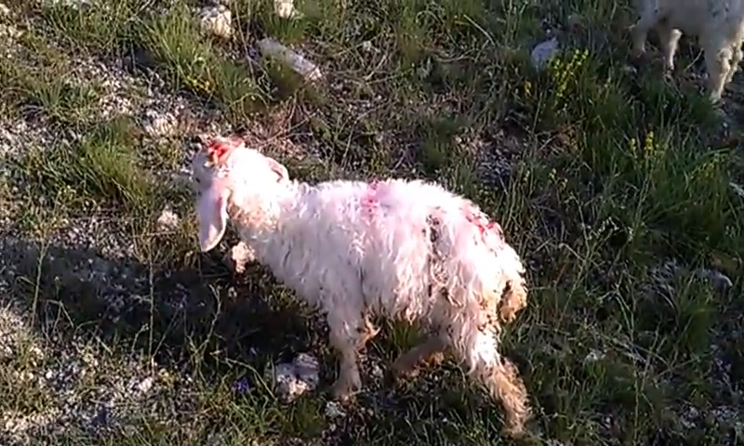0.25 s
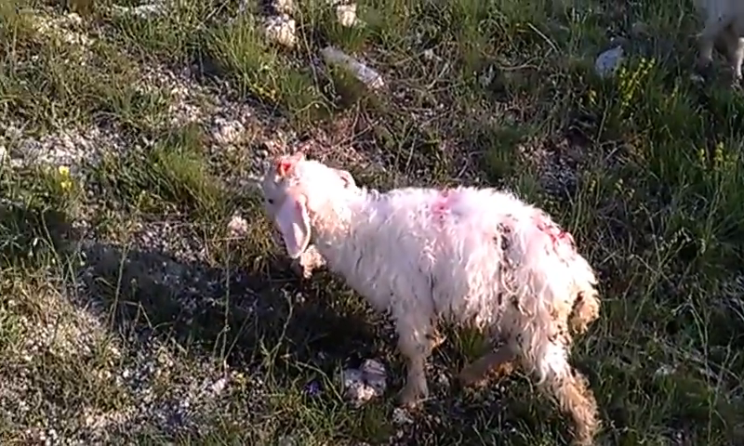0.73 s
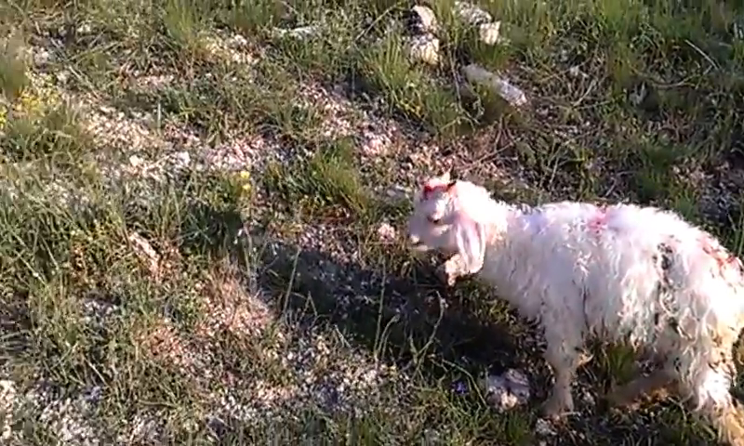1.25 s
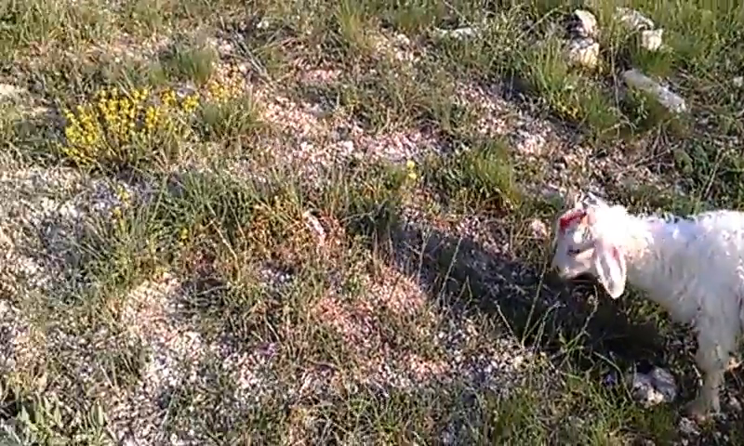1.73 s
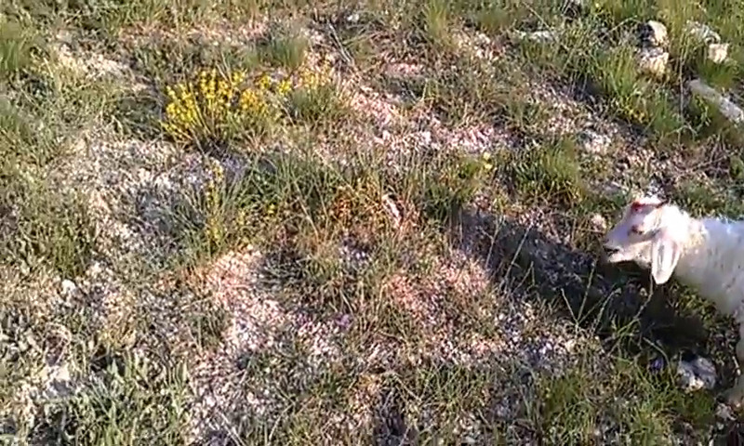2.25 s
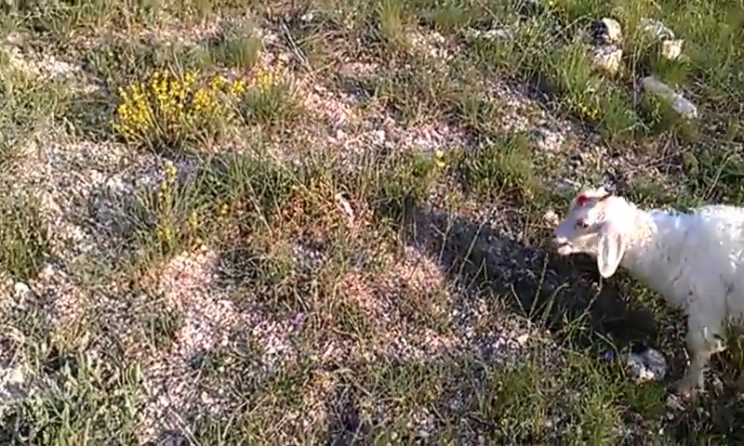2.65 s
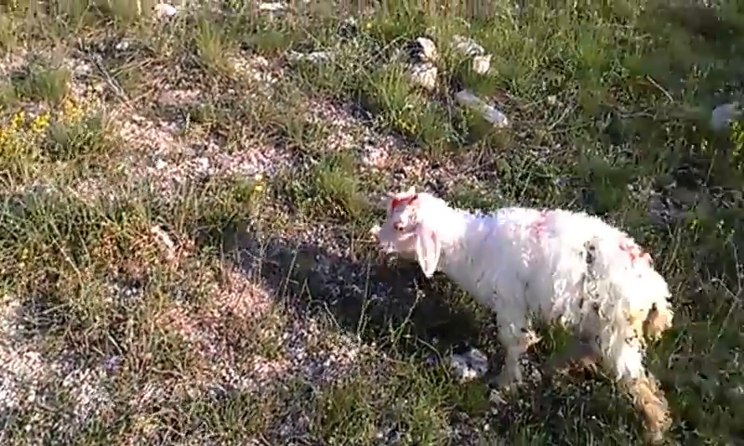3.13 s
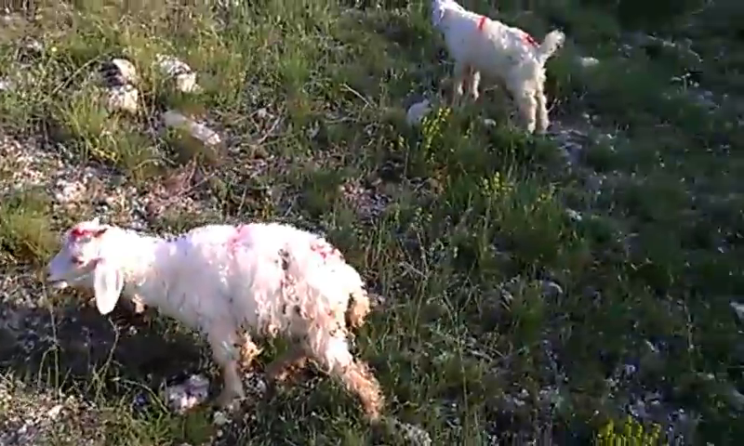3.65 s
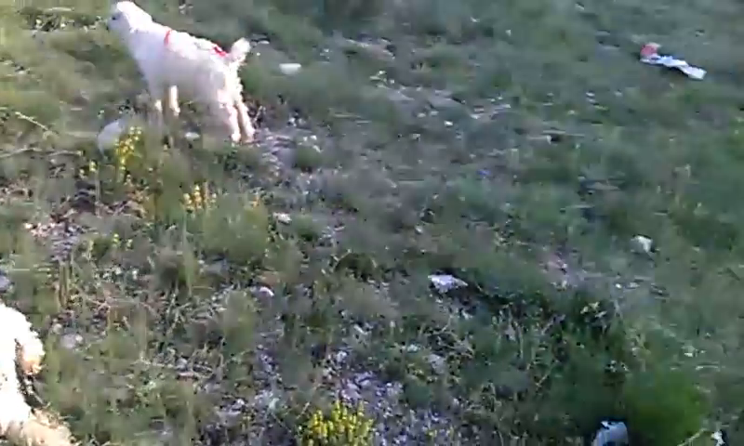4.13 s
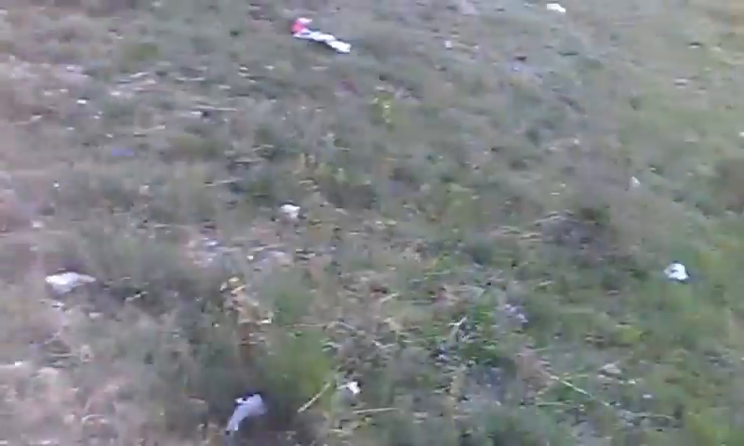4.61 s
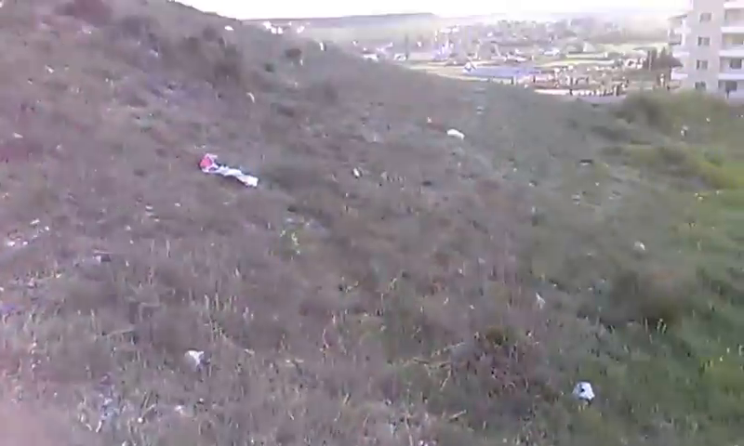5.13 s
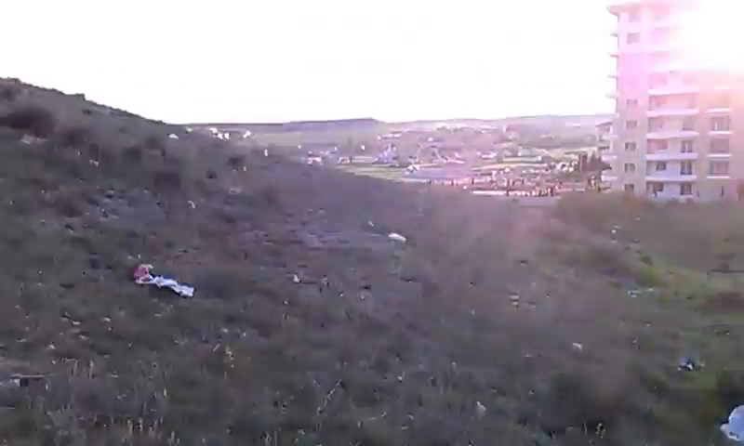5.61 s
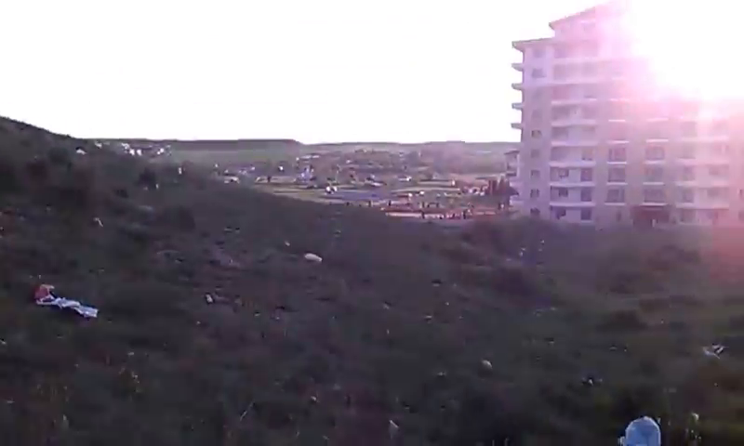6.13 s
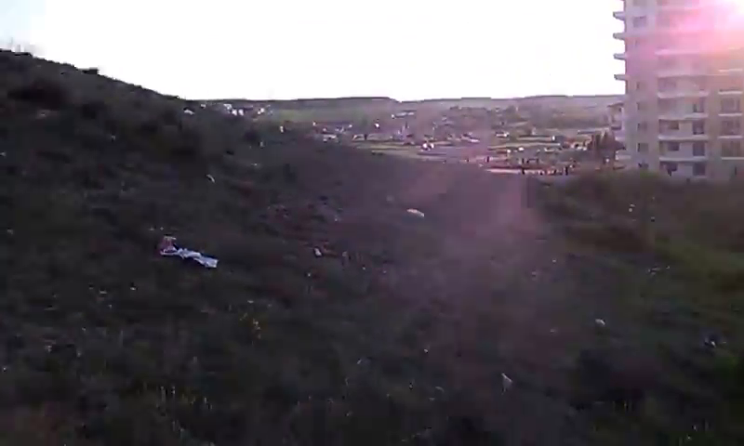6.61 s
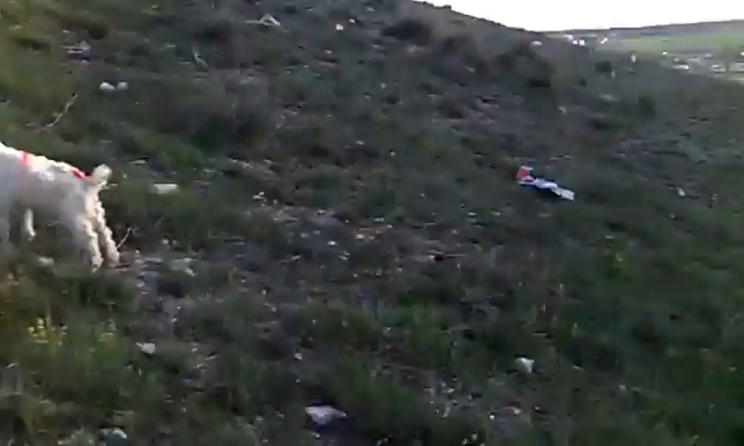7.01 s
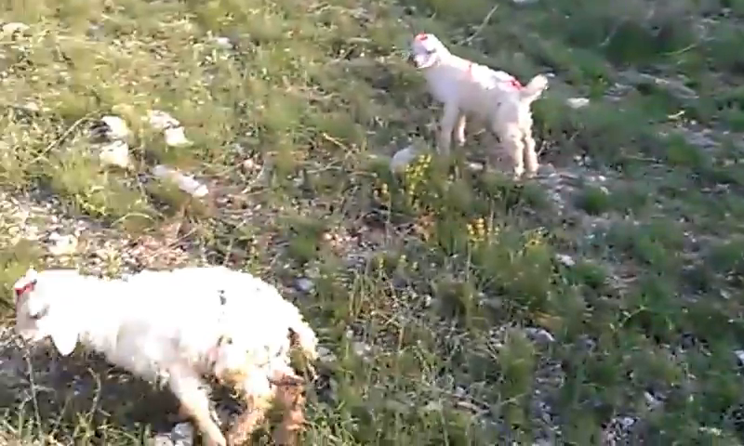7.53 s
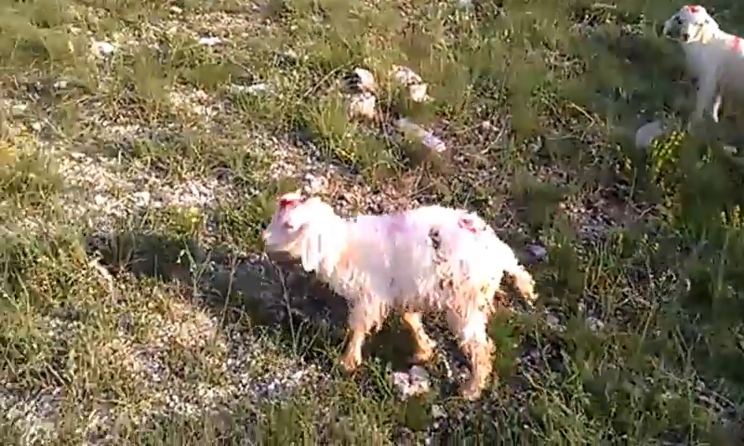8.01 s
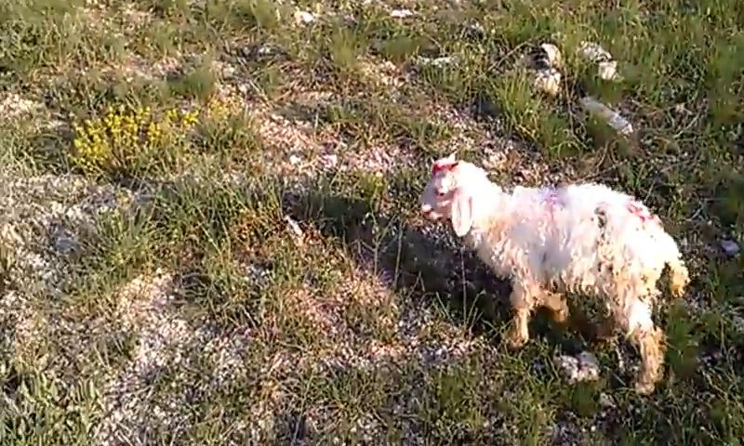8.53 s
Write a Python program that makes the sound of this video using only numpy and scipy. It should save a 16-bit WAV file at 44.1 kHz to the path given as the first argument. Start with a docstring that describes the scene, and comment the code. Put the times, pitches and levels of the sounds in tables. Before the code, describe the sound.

On a grassy hillside, a quavering kid's bleat overlaps another, followed by sparse fainter bleats, repeated falling bird chirps, cloth rustle and light wind.

```python
"""Two goat kids bleat on an open grassy slope, at first over each other, then in single shorter calls.
A small bird repeats phrases of four falling chirps; a sleeve swishes, dry grass ticks and wind puffs.
The bleats are harmonics shaped by a throat, the chirps and the far herd are sliding tones, and cloth, grass,
wind and background are mostly coloured noise. Two microphone ports hear it all, and a noise suppressor
in the camera turns quiet moments down."""
import sys
import numpy as np
from scipy import signal
from scipy.fft import rfft, irfft, next_fast_len
from scipy.io import wavfile
from scipy.ndimage import uniform_filter1d, map_coordinates

SR = 44100
rng = np.random.default_rng(int(sys.argv[2]) if len(sys.argv) > 2 else 0)


def bounce(signal):
    """Save signal as a 16-bit WAV file at the path given by the first command-line argument."""
    frames = np.transpose(np.atleast_2d(signal))
    limited = np.clip(frames, -1, 1)
    pcm = np.round(limited * 32767).astype(np.int16)
    wavfile.write(sys.argv[1], SR, pcm)


N = 386316  # length of the scene in samples

# Throat and mouth of each bleat. Each row: frequency in Hz, strength of a harmonic there in dB.
LONG_THROAT = [(480, -39), (1000, -23), (1480, -0.5), (1950, -21.5), (2500, -15), (3000, -13), (3500, -7.5),
               (4000, -8), (4500, -10.5), (5000, 0), (5450, -8), (5950, -39), (6600, -60), (9000, -95)]
SECOND_THROAT = [(480, -27.5), (950, -16.5), (1480, -9), (1900, -9.5), (2400, -2.5), (2850, -8), (3300, -6),
                 (3800, -4.5), (4700, -6), (6000, -74), (8000, -85.5)]
SHORT_THROAT = [(480, -32), (950, -20.5), (1420, -5), (1900, -7.5), (2400, -9), (2850, -4), (3300, 0.5),
                (3800, -8), (4250, -2), (4750, 3), (5200, -7.5), (5800, -36.5), (8000, -64)]
SIDE_THROAT = [(500, -38.5), (1000, -49.5), (1520, 1.5), (2000, -16.5), (2500, -18), (3050, -4),
               (3500, -11.5), (4500, -1.5), (5050, -11.5), (5700, -50.5), (8000, -66)]
LAST_THROAT = [(480, -44.5), (950, -27.5), (1450, -3), (1900, -13.5), (2400, -15), (2880, -7.5),
               (3350, -1.5), (3850, -7), (4350, -0.5), (4820, -2), (5300, -9.5), (5800, -14.5),
               (8000, -59.5)]
# How the kids' voices differ between the ports. Each row: frequency in Hz, left minus right in dB.
PORT_DIFFERENCE = [(1500, 1), (2600, -2), (3400, -0.5), (4400, -12.5), (5200, -14.5), (6500, 18.5)]
# Colour of the rasp in the long bleat. Each row: frequency in Hz, relative strength in dB.
RASP_COLOUR = [(1800, -18.5), (2300, -19), (2800, -9), (3300, -3), (3800, -13.5), (4300, -27.5),
               (5500, -42.5), (7000, -45.5)]
# The bleats, each an arch of pitch. Each row: start, crest and end in seconds, first, top and last pitch in Hz,
# flatness of the arch (a power), level in dB, attack and release in seconds.
BLEATS = [(.955, 1.27, 1.655, 446, 505, 436, 3.5, -30, 0.327, 0.1267),
          (.945, 1.47, 1.923, 437, 514, 424, 1.35, -36, 0.143, 0.892),
          (2.405, 2.63, 2.803, 423, 481, 421, 1.8, -44.5, 0.1298, 0.234),
          (6.52, 6.8, 7.14, 444, 507, 460, 1.6, -48, 0.198, 0.64),
          (7.81, 8.0, 8.16, 330, 483, 420, 4, -44.5, 0.136, 0.0498)]
# The quaver of each bleat. Each row: reference time of a crest in seconds, crests per second at that time,
# speed-up in crests per second each second, first and last depth in Hz (before the release shrinks it).
QUAVERS = [(1.472, 13.8, 18.5, 1.57, 14.53), (1.42, 4.555, 1, 1.6, 1.13), (2.565, 13.4, -7.5, 12.06, 1.43),
           (6.82, 6.8, 1, 2.24, 1.7), (12, 9.59, 2.5, 3.28, 1.52)]
EDGE_DB, EDGE_BEND = 22, 2.626  # a bleat starts and ends this far below its level; bend of attack and release
QUAVER_DB_PER_HZ = 0.1082  # the voice gets louder as the quaver lifts it
SLACK = 0.2  # dB that the top harmonics lose for each dB of weaker voice
# Even throbs of rasp: middle of the first, spacing and half-width in seconds, then strength
THROB_S, THROB_GAP_S, THROB_WIDTH_S, THROB_ROUGH = 1.094, 0.08837, 0.0176, 0.682

# Bird phrases. Each row: start of the last chirp in seconds, its level in dB,
# rise in dB that sets how the level climbs from chirp to chirp (below zero it sinks).
PHRASES = [(0.021, -39.5, -2), (0.582, -40.5, 2.5), (1.157, -36.5, 0.5), (1.895, -42.5, 2), (2.798, -57, 1),
           (3.305, -51.5, 1.5), (3.832, -40.5, 2), (4.312, -42, 1.5), (4.822, -40, 1.52), (5.316, -37, 0.5),
           (5.758, -34, 2.19), (6.275, -34.5, 2.48), (6.709, -35.5, 2.5), (7.271, -40, 2), (8.07, -38, 1.5),
           (8.586, -57.5, 0)]
# Single slurred whistles. Each row: start and length in seconds, first and last pitch in Hz, level in dB.
WHISTLES = [(.115, 0.049, 4046, 3420, -54.5), (.162, 0.04, 2753, 3052, -59.5),
            (3.17, 0.0835, 3880, 2947, -53.5), (3.312, 0.0733, 4870, 4022, -45),
            (3.755, 0.0287, 4040, 3425, -54.5), (3.775, 0.018, 3400, 4010, -52),
            (6.645, 0.024, 3970, 3213, -56.5), (7.67, 0.046, 3114, 3310, -59)]
# Length in seconds, first pitch and fall in Hz of the last chirp, before small random changes; bend of the fall
CHIRP_S, CHIRP_HZ, CHIRP_FALL_HZ, CHIRP_BEND = 0.03504, 4445.3, 574, 1.53
CHIRP_GAP_S, CHIRP_STEP = 0.0432, 0.007  # spacing in a phrase; share by which each next chirp is higher
TRILL_S, TRILL_DEPTH = 0.01064, 0.435  # period in seconds and depth of the flutter inside a chirp

# Sleeve strokes. Each row: start, fastest moment and end in seconds, level at the fastest moment in dB,
# swell up to it in dB, sag after it in dB, scrape against the swish halfway through the stroke in dB.
STROKES = [(4.169, 4.291, 4.44, -51, 6.5, 4.5, -21.5), (4.304, 4.346, 4.39, -43, 7.5, 23, -13.5),
           (4.543, 4.6, 4.632, -37, 8, 16, -7.5), (4.913, 5.07, 5.19, -28.5, 17, 4.5, -7.5),
           (5.192, 5.29, 5.52, -49.5, 14.5, 12, -15)]
# Colour of the soft swish and of the sharp scrape. Each row: frequency in Hz, relative strength in dB.
SWISH_COLOUR = [(600, -51), (1300, -25), (2200, -13.5), (3200, -1), (4300, -3), (5300, -14.5), (7000, -25),
                (10000, -69.5)]
SCRAPE_COLOUR = [(3500, -24.5), (5500, -6.5), (6600, -1), (8200, -6.5), (9400, -23), (11000, -16),
                 (13500, -23)]
# Bend of the swell; dB the scrape gains over a stroke; soft ends of a stroke in seconds
SWELL_BEND, BRIGHTEN_DB, STOP_S = 1.856, 18.5, 0.01475

# Ticks and crunches of dry grass, and at 2.43 s a click as the short bleat starts. Each row: start in seconds,
# level in dB, time to fade by 60 dB in seconds.
TICKS = [(2.43, -41.5, 0.035), (3.63, -46, 0.065), (4.008, -42, 0.0168), (4.43, -44.5, 0.124),
         (4.5, -46.5, 0.0415), (4.531, -43, 0.0175), (4.553, -50.5, 0.0335), (4.689, -40.5, 0.034),
         (4.742, -50.5, 0.037), (4.833, -42, 0.0138), (4.884, -39, 0.0133), (5.276, -40, 0.094),
         (6.837, -43.5, 0.0175), (6.95, -49, 0.021), (8.166, -49, 1), (8.21, -45.5, 0.328),
         (8.24, -52.5, 0.186), (8.323, -47, 0.06)]
# Colour of a snapping stalk. Each row: frequency in Hz, relative strength in dB.
STALK_COLOUR = [(300, -2.5), (1200, 1.5), (2200, 3.5), (3300, 8.5), (4800, 11), (6000, -9.5), (8000, -22),
                (13000, -44.5)]

# Puffs of wind. Each row: peak time in seconds, level before the bass cut in dB,
# time to die by 60 dB in seconds.
PUFFS = [(1.05, -61.5, 2.5), (5.31, -47, 2.26), (5.461, -56.5, 0.01), (5.61, -48.5, 1), (5.77, -44, 0.48),
         (5.98, -49.5, 0.98), (6.068, -58.5, .5), (6.379, -54, 0.27), (7.559, -52, 0.37)]
PUFF_RISE_DB_PER_S = 317  # how fast a puff builds up
# Low thumps on the ports. Each row: start in seconds, strength in dB (3 dB are added later),
# pitch in Hz, time to fade by 60 dB in seconds.
THUMPS = [(5.295, -34.5, 174.8, 0.098), (5.594, -28, 183.8, 0.0251), (5.756, -43.5, 154, 0.053),
          (5.782, -38.5, 200, 0.018), (7.814, -30.5, 165, 0.0243), (7.831, -34, 139, 0.0237),
          (8.252, -28, 307.6, 0.0204)]
# Colour of the wind at the ports. Each row: frequency in Hz, relative strength in dB.
BUFFET_COLOUR = [(40, -53.5), (80, -4.5), (130, 2.5), (220, -1), (350, -7.5), (600, -58.5), (1200, -70.5),
                 (4000, -92)]

# Calls of the far herd. Each row: start and length in seconds, first and last pitch in Hz, level in dB.
HERD = [(.54, 0.125, 1303, 1260, -63), (1.9, 0.2402, 1198, 1292, -64.5), (1.95, 0.0899, 683.3, 730, -62.5),
        (4.78, 0.207, 2415, 2474, -62.5), (5.2, 0.59, 1905, 1469, -72.5), (7.42, 0.48, 1165, 1165, -74.5)]
# Colours of the background: town rumble, thin hiss, far birds.
# Each row: frequency in Hz, relative strength in dB.
RUMBLE_COLOUR = [(20, 10), (60, -25.5), (130, -16), (215, -2), (310, 2), (480, -6.5), (900, -9.5),
                 (1500, -14.5), (3000, -15.5), (8000, -59.5)]
HISS_COLOUR = [(700, 1.5), (1500, 2), (3000, -1), (4500, 0.5), (5500, -7.5), (8000, -13.5), (13500, -12.5)]
TWITTER_COLOUR = [(2500, -24), (3800, -13.5), (4300, -5.5), (4650, -2), (5000, -9.5), (5600, -33),
                  (8000, -66.5)]
RUMBLE_DB, HISS_DB, TWITTER_DB = -59, -58, -65  # background levels before drift and the turn
DRIFT_DB = 1.0  # size of the slow wander of rumble and hiss
TURN_S, TURN_WIDTH_S = 5, 0.832  # the camera swings towards the open valley: middle and half-width
TURN_RUMBLE_DB, TURN_TWITTER_DB = 3, 10.5  # what the far sounds gain at the middle of the turn

# How far the shut noise suppressor turns the sound down. Each row: frequency in Hz, cut in dB.
SUPPRESSION = [(300, 2.5), (1400, 10), (3000, 11), (4600, 10), (6000, 4)]
OPEN_DB, KNEE_DB = -43.5, 11  # fully open above this level, fully shut this far below it
TOP_HZ = 14000  # nothing passes from here up


def kids():
    """A long quavering bleat and a smoother second voice, then three softer calls, the side one more echoing."""
    long, second, short, side, last = map(effort, BLEATS, QUAVERS)
    clear_db, soft_db = -23, -15  # breath in a clear voice and in a soft one
    ahead = (bleat(long, LONG_THROAT, lag_ms=0.3119, jitter=0.00299, husk_db=clear_db, opening_db=6.5, count=7)
             + bleat(second, SECOND_THROAT, lag_ms=0.359, jitter=0.00327, husk_db=clear_db, opening_db=-7)
             + bleat(short, SHORT_THROAT, lag_ms=0.347, jitter=0.0051, husk_db=soft_db, opening_db=-9.5)
             + bleat(last, LAST_THROAT, lag_ms=0.253, jitter=0.0062, husk_db=soft_db, opening_db=-0.5))
    behind = bleat(side, SIDE_THROAT, lag_ms=0.1026, jitter=0.00454, husk_db=-14, opening_db=-5.5)
    return hillside(ahead, wet_db=-12, t60=0.308) + hillside(behind, wet_db=-7, t60=0.205)


def effort(call, quaver):
    """Times, pitch and level of a bleat: the pitch arches and quavers; the level rises, holds and falls."""
    start, crest, end, first_hz, top_hz, last_hz, flatness, db, attack, release = call
    beat_s, rate, speed_up, first_depth, last_depth = quaver
    t = span(start, end)
    before, after = from_crest(t, start, crest, end)
    arch = top_hz - (top_hz - first_hz) * before ** flatness - (top_hz - last_hz) * after ** flatness
    rising = np.clip(1 - (t - start) / attack, 0, 1)
    fading = np.clip(1 - (end - t) / release, 0, 1)
    turns = rate * (t - beat_s) + speed_up * (t - beat_s) ** 2 / 2
    depth = np.linspace(first_depth, last_depth, len(t)) * (1 - fading)
    shake = depth * np.cos(2 * np.pi * turns)
    edges = rising ** EDGE_BEND + fading ** EDGE_BEND
    return t, arch + shake, db - EDGE_DB * edges + QUAVER_DB_PER_HZ * shake


def bleat(call, throat, lag_ms, jitter, husk_db, opening_db, count=0, rasp_db=-5):
    """Vocal fold harmonics through the throat; in each of count throbs the folds double their period and rasp."""
    t, pitch, db = call
    n = len(t)
    shaky_pitch = pitch * (1 + jitter * wobble(261.06, n))
    phase = 2 * np.pi * np.cumsum(shaky_pitch) / SR
    # as the mouth opens or closes, strength shifts between the low and the high harmonics
    tilt_db = np.linspace(-opening_db, opening_db, n)
    # a weaker push closes the folds more softly and loses the upper harmonics
    slack_db = SLACK * (db - db.max())
    voice = np.zeros(n)
    for k in range(1, 13):
        strength_db = along(throat, k * pitch) + 1.76 * wobble(34.97, n)
        strength_db += tilt_db * np.clip((k - 7) / 4, -1, 1)
        strength_db += slack_db * np.clip((k - 5) / 4, 0, 1)
        voice += amp(strength_db) * np.sin(k * phase + rng.uniform(0, 2 * np.pi))
    # air escapes once a cycle
    breath = noise(throat, n, alike=0.422)[0] * (1 + np.cos(phase))
    voice = unit(voice) + amp(husk_db) * breath
    if count:
        rough, halves = np.zeros(n), np.zeros(n)
        for k in range(count):
            rough += THROB_ROUGH * np.exp(-((t - THROB_S - k * THROB_GAP_S) / THROB_WIDTH_S) ** 2)
        # a doubled period adds tones halfway between the harmonics
        for k in range(3, 12):
            strength = amp(along(RASP_COLOUR, (k + 0.5) * pitch))
            halves += strength * np.sin((k + 0.5) * phase + 1.46 * wobble(150, n))
        voice = voice * (1 - 0.093 * rough) + amp(rasp_db) * rough * unit(halves)
    voice = voice * amp(db) * fade(t, 0.0084)

    def ports(hz):
        """The right port hears the call lag_ms late; the camera body shades part of the treble at the left."""
        turn = np.pi * hz * lag_ms / 1000 * np.array([[1], [-1]])
        return pan(along(PORT_DIFFERENCE, hz)) * np.exp(1j * turn)

    out = np.zeros((2, N))
    add(out, t[0], filtered(voice, ports))
    return out


def bird():
    """Phrases of four falling chirps, each a little higher and mostly louder than the last, plus whistles."""
    out = np.zeros(N)
    t = span(0, CHIRP_S)
    u = np.linspace(0, 1, len(t))
    hz = CHIRP_HZ - CHIRP_FALL_HZ * u ** CHIRP_BEND  # falls ever faster
    trill = 1 + TRILL_DEPTH * np.cos(2 * np.pi * t / TRILL_S)
    shape = np.sin(np.pi * u ** 0.665) * trill
    for s, db, rise_db in PHRASES:
        for early in range(4):  # counted back from the last chirp
            pitch = hz * (1 - CHIRP_STEP * early + 0.006 * wobble(300, len(t)))
            level_db = db - rise_db * early * (0.731 + 0.366 * early) + wobble(384, len(t))
            chirp = amp(level_db) * shape * np.sin(2 * np.pi * np.cumsum(pitch) / SR)
            add(out, s - early * CHIRP_GAP_S, chirp)
    song = pan(0.17) * (out + glides(WHISTLES, waver=0.0168))
    return hillside(song, wet_db=-15, t60=0.5)


def glides(rows, waver):
    """Single tones that swell, slide and fade, with a slight random waver in pitch."""
    out = np.zeros(N)
    for s, length, first_hz, last_hz, db in rows:
        n = int(length * SR)
        hz = np.linspace(first_hz, last_hz, n) * (1 + waver * wobble(120.74, n))
        swell = np.sqrt(2) * np.sin(np.linspace(0, np.pi, n))
        add(out, s, amp(db) * swell * np.sin(2 * np.pi * np.cumsum(hz) / SR))
    return out


def sleeve():
    """Cloth slides on cloth near the left port, its scrape growing in each stroke; catching threads add grain."""
    out = np.zeros((2, N))
    for start, fastest, end, db, swell_db, sag_db, scrape_db in STROKES:
        t = span(start, end)
        n = len(t)
        before, after = from_crest(t, start, fastest, end)
        level_db = db - swell_db * before ** SWELL_BEND - sag_db * after
        bright_db = scrape_db + BRIGHTEN_DB * np.linspace(-0.5, 0.5, n)
        scrape = amp(bright_db) * noise(SCRAPE_COLOUR, n, alike=0.156)
        rubbing = noise(SWISH_COLOUR, n, alike=0.324) + scrape
        threads_db = 0.5 * wobble(900, n) + wobble(78.1, n)
        add(out, start, pan(8.93) * amp(level_db + threads_db) * rubbing * fade(t, STOP_S))
    return out


def grass():
    """Dry stalks snap and crunch, and a click opens the short bleat: bursts of crackling noise that die away
    and last a quarter second at most."""
    out = np.zeros((2, N))
    t = np.arange(SR // 4) / SR
    for s, db, t60 in TICKS:
        crackle_db = 2.5 * wobble(700, len(t))
        level_db = db - 60 * t / t60 + crackle_db
        add(out, s, pan(0.43) * amp(level_db) * noise(STALK_COLOUR, len(t), alike=0.205))
    return out


def wind():
    """Eddies buffet the ports as low noise; the hardest ones land as short thumps."""
    out = np.zeros((2, N))
    t = span(-0.1, 0.5)  # around the peak of a puff
    for s, db, t60 in PUFFS:
        flutter_db = 3.66 * wobble(34.49, len(t))
        eddies = unit(noise(BUFFET_COLOUR, len(t), alike=0.625) * amp(flutter_db))
        rise_and_fall_db = np.minimum(PUFF_RISE_DB_PER_S * t, -60 * t / t60)
        add(out, s + t[0], amp(db + rise_and_fall_db) * eddies * fade(t, 0.01925))
    t = np.arange(SR // 5) / SR
    for s, db, hz, t60 in THUMPS:
        push = np.sin(2 * np.pi * hz * t) * amp(-60 * t / t60) * (1 - np.exp(-t / 0.0012))
        knock = 0.208 * np.sin(2 * np.pi * 2.267 * hz * t) * amp(-60 * t / 0.0249)
        add(out, s, pan(6.5) * amp(db + 3) * (push + knock))
    # the small ports pass little deep bass
    return signal.sosfilt(signal.butter(2, 90, "highpass", fs=SR, output="sos"), out)


def air():
    """Rumble of the distant town, a thin hiss over the grass and the blurred twitter of far birds, all noise."""
    facing = np.exp(-((np.arange(N) / SR - TURN_S) / TURN_WIDTH_S) ** 2)  # 1 when facing the valley
    rumble_db = RUMBLE_DB + TURN_RUMBLE_DB * facing + DRIFT_DB * wobble(9.1, N)
    hiss_db = HISS_DB + DRIFT_DB * wobble(6.4, N)
    twitter_db = TWITTER_DB + TURN_TWITTER_DB * facing + 1.89 * wobble(28, N)
    rumble = amp(rumble_db) * noise(RUMBLE_COLOUR, N, alike=0.792)
    hiss = amp(hiss_db) * noise(HISS_COLOUR, N, alike=0.029)
    twitter = amp(twitter_db) * noise(TWITTER_COLOUR, N, alike=0.18)
    return pan(0.43) * rumble + pan(0.5) * (hiss + twitter)


def hillside(x, wet_db, t60):
    """Ground and stones scatter a thin tail back, different at each port."""
    t = np.arange(SR // 2) / SR
    tail = rng.standard_normal((2, len(t))) * amp(-60 * t / t60) * (1 - np.exp(-t / 0.002))
    tail = tail / np.linalg.norm(tail[0])
    return x + amp(wet_db) * signal.fftconvolve(x, tail, axes=1)[:, :N]


def amp(db):
    """Decibels to gain."""
    return 10 ** (np.asarray(db) / 20)


def unit(x):
    """Scale to an rms (average strength) of 1."""
    return x / np.sqrt(np.mean(x ** 2) + 1e-20)


def along(points, hz):
    """Read a curve of (Hz, value) points at hz, with straight lines on a log frequency axis."""
    f, v = np.transpose(points)
    return np.interp(np.log(hz + 1), np.log(f + 1), v)


def span(start, end):
    """The sample times from start to end, in seconds."""
    return np.arange(round(start * SR), round(end * SR)) / SR


def from_crest(t, start, crest, end):
    """How far t lies before and after a crest: 0 at the crest, 1 at the start or the end."""
    before = np.clip((crest - t) / (crest - start), 0, 1)
    after = np.clip((t - crest) / (end - crest), 0, 1)
    return before, after


def fade(t, edge):
    """A gate with soft ends, each edge seconds long, over the times t."""
    return np.clip(np.minimum(t - t[0], t[-1] - t) / edge, 0, 1)


def wobble(rate, size):
    """A smooth random curve through rate random points a second."""
    knots = rng.standard_normal(int(size * rate / SR) + 4)
    return map_coordinates(knots, [np.arange(size) * rate / SR])


def filtered(x, response):
    """Shape the spectrum of x by a response, given as a function of frequency in Hz."""
    n = x.shape[-1]
    m = next_fast_len(n + 4096)
    return irfft(rfft(x, m) * response(np.fft.rfftfreq(m, 1 / SR)), m)[..., :n]


def noise(spectrum, size, alike):
    """Coloured stereo noise of rms 1; alike is the share of power common to both ports."""
    white = rng.standard_normal((3, size))
    stereo = alike ** 0.5 * white[2] + (1 - alike) ** 0.5 * white[:2]
    return unit(filtered(stereo, lambda hz: amp(along(spectrum, hz))))


def pan(db):
    """Left and right gains of equal total power for a left-minus-right difference in dB."""
    gains = amp(np.array([np.atleast_1d(db), -np.atleast_1d(db)]) / 2)
    return gains / np.sqrt(np.mean(gains ** 2, axis=0))


def add(track, s, x):
    """Mix x into the track from time s (in seconds) on."""
    start = round(s * SR)
    lo, hi = max(start, 0), min(start + x.shape[-1], N)
    if hi > lo:
        track[..., lo:hi] += x[..., lo - start:hi - start]


def scene():
    """All sources on the slope; the far herd is heard more as echo than directly."""
    herd = hillside(pan(0) * glides(HERD, waver=0.0141), wet_db=4.0, t60=0.355)
    rustle = hillside(sleeve() + grass(), wet_db=-12.0, t60=0.089)
    return kids() + bird() + rustle + wind() + herd + air()


def record(dry):
    """A noise suppressor turns quiet moments down, most in the middle bands; a band limit cuts the top."""
    hz, t, z = signal.stft(dry, SR, nperseg=256)
    # loudness over a sliding window of about 50 ms, set off-centre
    power = np.abs(uniform_filter1d(np.mean(dry ** 2, axis=0), size=2200, origin=700))
    level_db = np.interp(t, np.arange(N) / SR, 10 * np.log10(power + 1e-12))
    closed = np.clip((OPEN_DB - level_db) / KNEE_DB, 0, 1)
    cut_db = np.outer(along(SUPPRESSION, hz), closed)
    quieter = signal.istft(z * amp(-cut_db), SR)[1][:, :N]
    return filtered(quieter, lambda hz: hz < TOP_HZ)


dry = scene()
out = record(dry)
bounce(out)
```